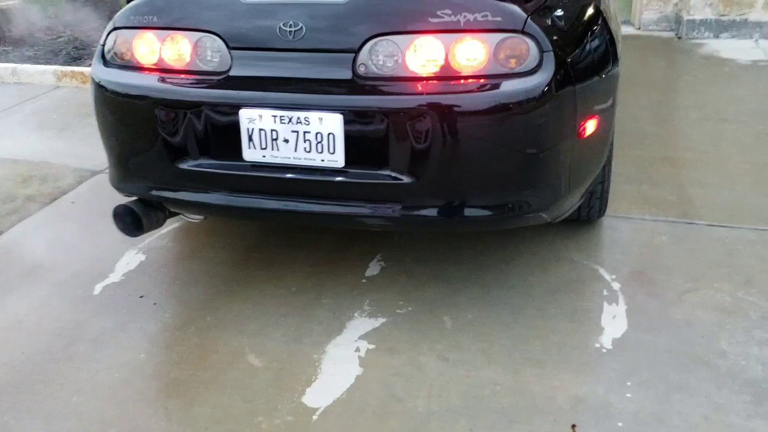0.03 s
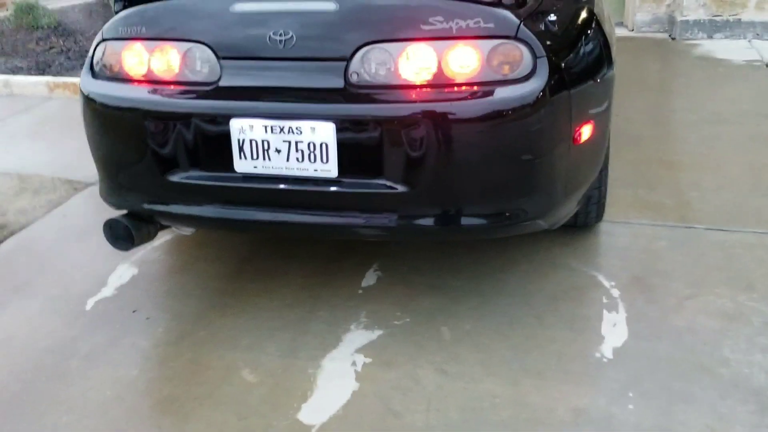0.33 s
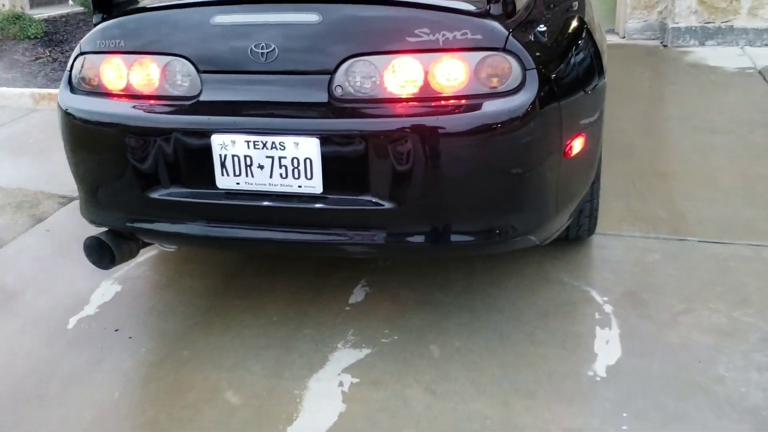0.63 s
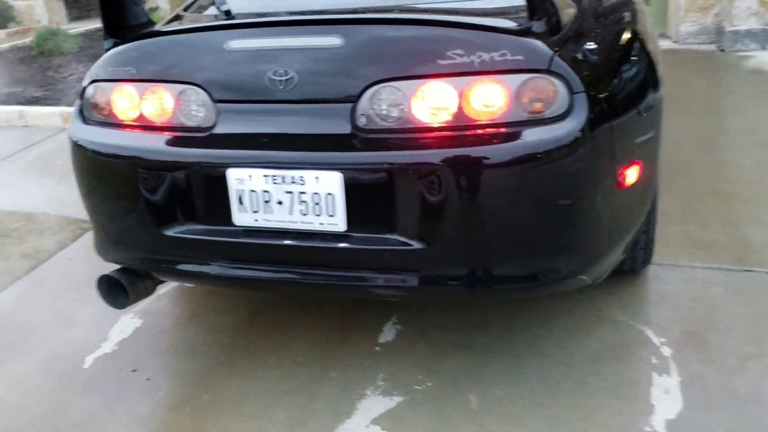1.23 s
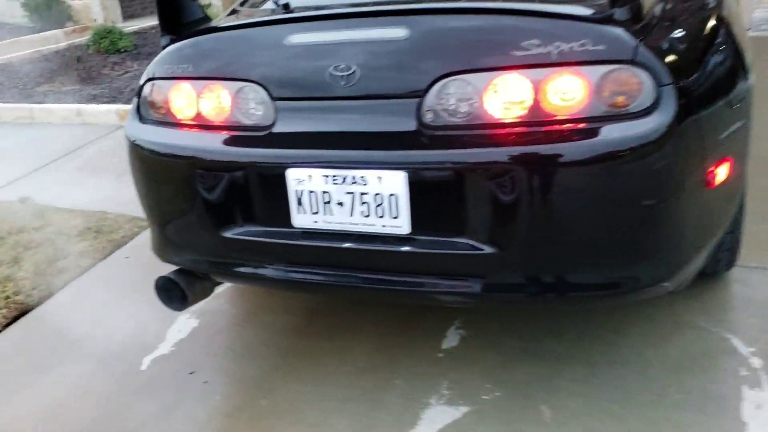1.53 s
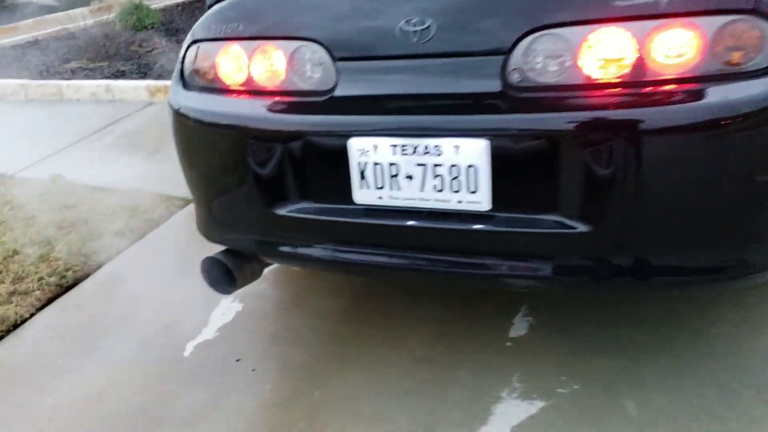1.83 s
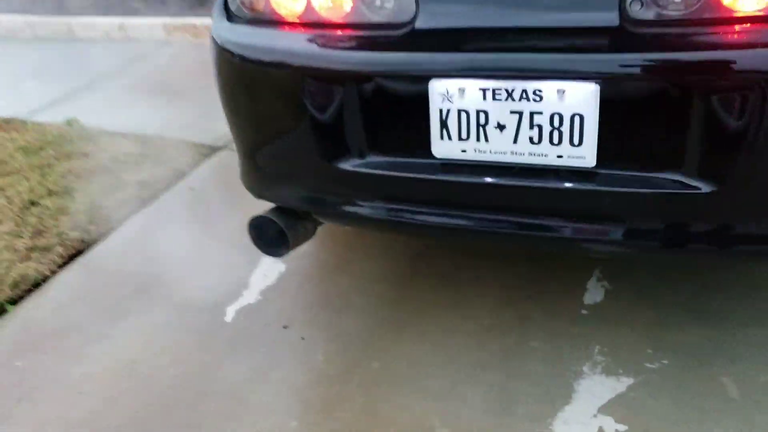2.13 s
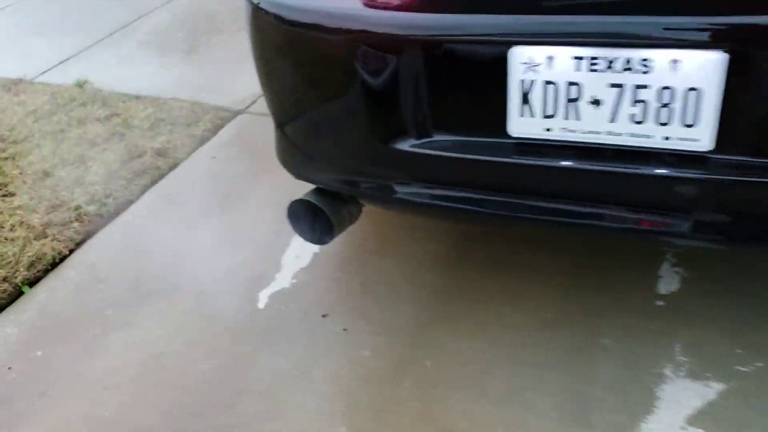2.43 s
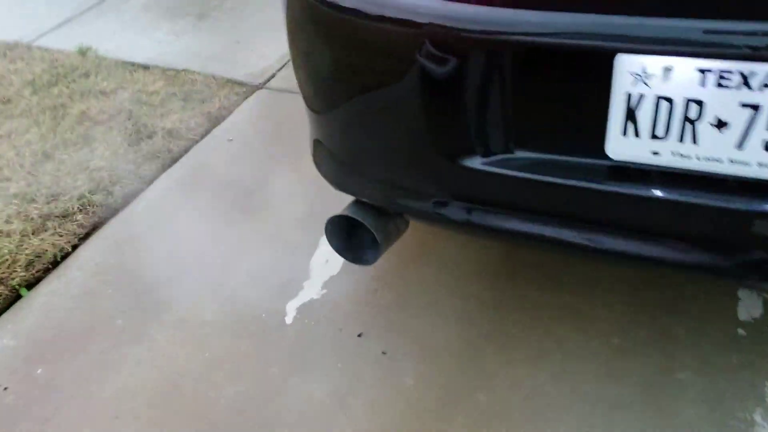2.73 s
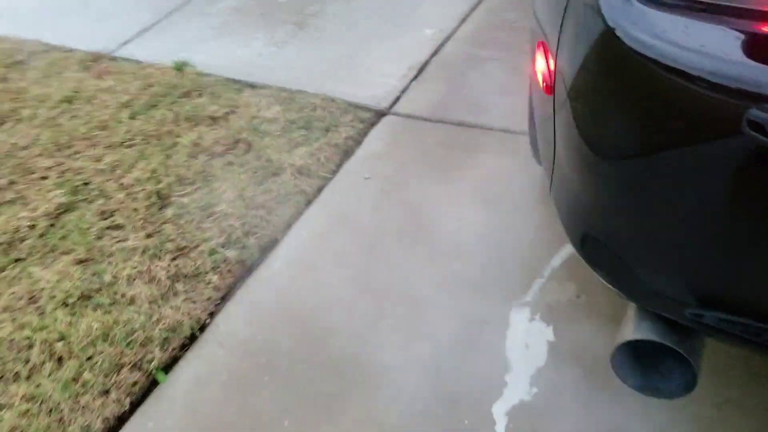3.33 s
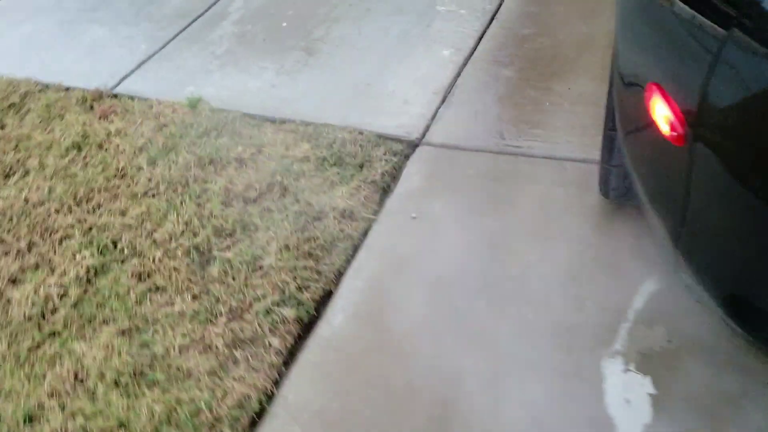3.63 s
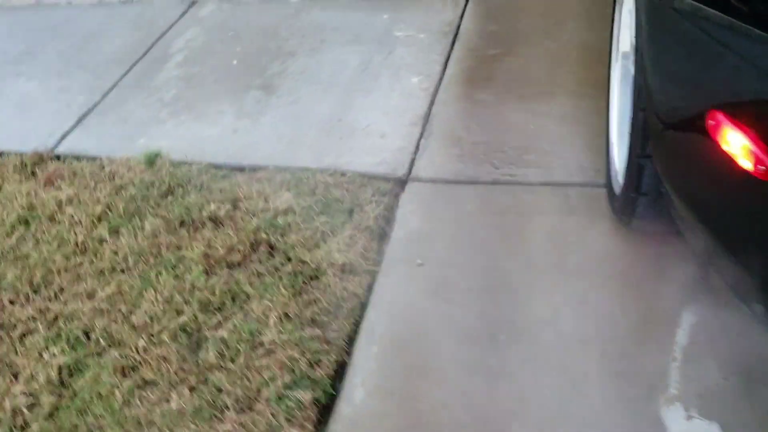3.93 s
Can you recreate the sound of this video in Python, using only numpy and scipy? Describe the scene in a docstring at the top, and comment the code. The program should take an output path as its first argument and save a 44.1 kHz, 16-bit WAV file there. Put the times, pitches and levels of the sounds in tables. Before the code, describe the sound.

A car engine idles from the very start with a deep, steady exhaust boom and a slight lope, heard from close behind. A faint engine whir, hiss and hum lie beneath it. From about 2 seconds the microphone moves beside the tailpipe and the soft puffing grows clearer, with one brief, small sputter near 2.9 seconds. The idle sinks slightly in pitch and continues until 4 seconds.

```python
"""The low boom of an idling six-cylinder car cuts in, heard from behind and then from beside the tailpipe.
Periodic pressure pulses make the boom at the firing rate; unequal cylinders make it lope once per cycle.
Each firing pushes a puff of turbulent gas through the pipe, with one brief sputter near 2.9 s.
Behind the exhaust, the running engine faintly whirs, hisses and hums."""
import sys
import numpy as np
from scipy.fft import rfft, irfft, next_fast_len
from scipy.io import wavfile
from scipy.ndimage import map_coordinates

SR = 44100
rng = np.random.default_rng(int(sys.argv[2]) if len(sys.argv) > 2 else 0)


def dump(signal):
    """Clip the signal to [-1, 1] and save it as 16-bit WAV at the path in sys.argv[1]."""
    limited = np.clip(np.atleast_2d(signal).T, -1, 1)
    pcm = np.round(limited * 32767).astype(np.int16)
    wavfile.write(sys.argv[1], SR, pcm)


N = 176400
CYLINDER_COUNT = 6
# engine speed: t/s, firing rate f/Hz
FIRING_RATE = [(0.09, 71.67), (0.3, 70.41), (0.55, 71.06), (0.8, 71.16), (1.05, 71.03), (1.35, 70.49),
               (1.6, 71.21), (1.85, 71.21), (2.1, 71.63), (2.3, 71.56), (2.55, 70.31), (2.85, 69.89),
               (3.1, 69.44), (3.3, 68.85), (3.6, 67.54), (3.98, 67.79)]


def amp(db):
    """Amplitude ratio of a level in decibels."""
    return 10 ** (np.asarray(db) / 20)


def along(points, hz):
    """Interpolation of (f/Hz, value) points on a logarithmic frequency axis."""
    f, values = np.transpose(points)
    return np.interp(np.log(hz + 1), np.log(f + 1), values)


def curves(rows):
    """Linear interpolation in time: one curve for each column after t/s."""
    times, *columns = np.transpose(rows)
    return [np.interp(np.arange(N) / SR, times, column) for column in columns]


def wobble(rate):
    """Smooth random fluctuation: a spline through `rate` knots a second."""
    return map_coordinates(rng.standard_normal(int(N * rate / SR) + 4), [np.arange(N) * rate / SR])


def filtered(x, response):
    """Linear filtering: the spectrum of x times a frequency response."""
    size = next_fast_len(N + SR // 2)
    return irfft(rfft(x, size) * response(np.fft.rfftfreq(size, 1 / SR)), size)[..., :N]


def noise(spectrum, gate=1):
    """Source and filter: gated white noise, shaped by a spectrum and scaled to rms 1."""
    x = filtered(gate * rng.standard_normal(N), lambda hz: amp(along(spectrum, hz)))
    return x / np.sqrt(np.mean(x ** 2) + 1e-20)


def pan(db):
    """Left and right gains, of mean 1, for an interchannel level difference."""
    gains = amp(np.array([db, -db]) / 2)
    return gains / gains.mean(0)


def spread(pair, colour):
    """Partial coherence: two noises mix into a wide, coloured stereo pair whose mean has rms 1."""
    # likeness of left and right: f/Hz, coherence
    coherence = [(500, 0.41), (1000, 0.35), (2000, 0), (14000, 0.0028)]
    # stereo balance: f/Hz, left minus right level/dB
    balance = [(60, 6.5), (120, -2), (240, 1.5), (470, 2.5), (920, 1.0), (1830, -4.5), (3630, -2),
               (7200, 5), (14300, 1)]
    angle = lambda hz: np.arccos(np.clip(along(coherence, hz), -1, 1)) / 2
    mid, side = filtered(pair, lambda hz: colour(hz) * np.array([np.cos(angle(hz)), np.sin(angle(hz))]))
    stereo = filtered(np.array([mid + side, mid - side]), lambda hz: pan(along(balance, hz)))
    return stereo / np.std(stereo.mean(0))


def position():
    """Listening position, from 0 behind the car to 1 beside the pipe."""
    # the listener's walk: t/s, share of the way round
    walk = [(0, 0), (1.9, 0), (2.4, 0.3), (2.8, 0.79), (3.2, 1), (4, 0.97)]
    return np.clip(curves(walk)[0], 0, 1)


def crank():
    """Phase is the integral of frequency: the running count of firings, slightly unsteady."""
    start, jitter = -.095, 0.0036  # in firings
    return start + np.cumsum(curves(FIRING_RATE)[0]) / SR + jitter * wobble(35)


def whir_peaks():
    """Interference: ground reflections favour narrow bands of whir, whose balance shifts on the walk."""
    # bands: f/Hz, bandwidth/Hz, level behind/dB, level beside/dB
    bands = [(1164, 29, -64, -88), (1334, 85, -64, -61), (1455, 19, -63, -74), (1617, 110, -61.5, -67.5),
             (1890, 17, -64, -76), (2028, 19, -61.5, -72), (2153, 54, -63, -74), (2576, 30, -64, -80),
             (4835, 110, -63, -63.5)]
    centres, widths, behind_db, beside_db = np.transpose(bands)

    def heard(levels):
        """Noise through a sum of Lorentzian peaks."""
        peaks = lambda hz: sum(amp(db) / np.sqrt(width) / (1 + (2 * (hz - centre) / width) ** 2)
                               for centre, width, db in zip(centres, widths, levels))
        return spread(rng.standard_normal((2, N)), peaks) * np.linalg.norm(amp(levels))

    beside = position()
    return np.sqrt(1 - beside) * heard(behind_db) + np.sqrt(beside) * heard(beside_db)


def machinery(firings):
    """Amplitude modulation: half-periodic whir, its peaks and fine hiss pulse gently with the engine."""
    # engine noise: t/s, relative whir level/dB, relative hiss level/dB
    levels = [(0.1, -46.5, -50.5), (0.19, -46, -48.5), (1.04, -45.5, -48), (1.42, -46, -50),
              (1.96, -47, -49), (3.01, -47, -51), (3.58, -49.5, -53), (3.98, -48.5, -53.5)]
    # spectrum of whir and hiss: f/Hz, relative density level/dB
    spectrum = [(410, -29.5), (700, -1), (746, -13.5), (805, -2), (998, -7.5), (1410, -6.5), (1810, -8),
                (2060, -6.5), (2250, -8), (3130, -6.5), (4350, -11), (4810, -10), (5670, -15),
                (7590, -14.5), (8840, -22.5), (12500, -14), (14500, -15)]
    whir_db, hiss_db = curves(levels)
    cycle_points, crossover_hz = 3750, 5600
    cycles = firings / CYLINDER_COUNT
    place = (cycles % 1) * cycle_points
    one_cycle = rng.standard_normal((2, cycle_points))
    periodic = np.array([map_coordinates(row, [place], mode="grid-wrap") for row in one_cycle])
    excitation = np.sqrt(0.5) * (periodic + rng.standard_normal((2, N)))
    low_share = lambda hz: 1 / (1 + (hz / crossover_hz) ** 10)
    colour = lambda hz: amp(along(spectrum, hz))
    whir = spread(excitation, lambda hz: colour(hz) * np.sqrt(low_share(hz)))
    hiss = spread(rng.standard_normal((2, N)), lambda hz: colour(hz) * np.sqrt(1 - low_share(hz)))
    swing_db = np.cos(2 * np.pi * firings) - 0.23 * np.cos(2 * np.pi * cycles) + .5 * wobble(160)
    return amp(swing_db) * (amp(whir_db - .5) * whir + amp(hiss_db + 2) * hiss + whir_peaks())


def hum(firings):
    """High harmonics of the firing rate make a faint hum, 8 dB weaker beside the pipe."""
    # hum partials: multiple of the firing rate, level behind/dB
    partials = [(10, -60.5), (11, -61), (15, -64.5)]
    tones = sum(amp(db + 1.1 * wobble(4.08)) * np.sin(2 * np.pi * k * firings) for k, db in partials)
    return np.sqrt(2) * tones * amp(-8 * position())


def rumble():
    """Turbulence in the exhaust gives steady low-frequency noise."""
    # rumble spectrum: f/Hz, relative density level/dB
    spectrum = [(20, -13), (45, 2), (110, -4.5), (220, -4.5), (290, -4), (350, -25), (600, -58),
                (1500, -100)]
    return amp(-36.5) * noise(spectrum)


def puffs(firings):
    """Pulsating flow: the noise of the gas swells with each firing, a little differently each time."""
    # strength of the flow noise: t/s, relative level/dB
    levels = [(.1, -50), (.8, -45.5), (1.35, -46), (1.8, -46), (2.1, -40.5), (2.45, -41), (2.9, -37),
              (3.3, -37.5), (3.6, -39.5), (4, -38)]
    # spectrum behind the car: f/Hz, relative density level/dB
    behind_spectrum = [(150, -35), (330, -3), (420, -5), (490, 4), (570, -4), (660, 0), (800, -18.5),
                       (1200, -33), (4000, -70)]
    # spectrum beside the pipe: f/Hz, relative density level/dB
    beside_spectrum = [(150, -34), (330, -2.5), (410, -5.5), (480, -2), (560, -10.5), (660, -21),
                       (850, -18), (1200, -38), (4000, -70)]
    swing_db, scatter_db = 7.5, 1.5
    gate = amp(swing_db * np.cos(2 * np.pi * firings) + scatter_db * wobble(70))
    beside = position() ** 1.6
    gas = np.sqrt(1 - beside) * noise(behind_spectrum, gate)
    gas += np.sqrt(beside) * noise(beside_spectrum, gate)
    return amp(curves(levels)[0] - 3) * gas


def sputter():
    """Transients: three sharper puffs leave the pipe as noise bursts with Gaussian envelopes."""
    # bursts: t/s, level at the crest/dB
    bursts = [(2.845, -36.5), (2.873, -25), (2.889, -38)]
    # burst spectrum: f/Hz, relative density level/dB
    spectrum = [(200, -23), (450, 11), (650, -1), (850, -15), (1300, -36), (4000, -70)]
    half_length_s = 0.0018
    t = np.arange(N) / SR
    envelope = sum(amp(db) * np.exp(-((t - at) / half_length_s) ** 2) for at, db in bursts)
    return envelope * noise(spectrum)


def lope(firings):
    """Fourier series: unequal cylinders repeat only once per cycle, adding harmonics of the cycle rate."""
    # harmonics: multiple of the cycle rate, weight behind/dB, weight beside/dB
    orders = [(4, -42.8, -46.5), (5, -49.2, -46.5), (7, -52.7, -49.4), (8, -47.1, -41.1), (9, -34.7, -31.2),
              (10, -37.7, -37.5), (11, -37.8, -37.3), (13, -28.3, -32.5), (14, -39.9, -38.4),
              (15, -32.5, -29.7), (16, -38.8, -38.1), (17, -33.7, -33.2), (18, -31.7, -25.1),
              (19, -30.0, -27.4), (20, -37.1, -35.2), (21, -32.6, -34.4), (22, -38.8, -40.3),
              (23, -53.4, -53.0), (24, -42.7, -38.6), (25, -41.5, -46.5), (26, -44.2, -52.9),
              (27, -49.8, -52.0), (28, -62.6, -49.6), (30, -63.4, -57.2), (33, -63.4, -51.0),
              (35, -59.9, -54.4), (36, -54.8, -48.6), (39, -67.6, -51.9), (40, -63.0, -50.9),
              (41, -60.4, -51.7), (42, -48.7, -51.3), (43, -63.8, -55.4), (48, -64.8, -50.7),
              (54, -57.4, -60.6)]
    # cylinders in firing order: relative pulse strength, lateness/firings
    cylinders = [(1.02, .011), (.91, .013), (1.06, -.02), (1.0, -.009), (1.06, -.014), (.96, .025)]
    pipe_delay_s, muffler_hz, muffler_width_hz, scatter_db = .0052, 242, 74, 1.62
    strength, lateness = np.transpose(cylinders)
    pulse_places = (np.arange(CYLINDER_COUNT) + lateness) / CYLINDER_COUNT
    cycles = firings / CYLINDER_COUNT
    cycle_hz = np.median(curves(FIRING_RATE)[0]) / CYLINDER_COUNT
    beside = position()
    tones = np.zeros(N)
    for k, behind_db, beside_db in orders:
        pulse_phase = np.angle(np.dot(strength, np.exp(-2j * np.pi * k * pulse_places)))
        gain = (amp(behind_db) * (1 - beside) + amp(beside_db) * beside) * amp(scatter_db * wobble(7))
        hz = k * cycle_hz
        # travel down the pipe and the muffler's resonance both retard the phase
        pipe_lag = 2 * np.pi * hz * pipe_delay_s
        muffler_lag = 2 * np.arctan2(hz * muffler_width_hz, muffler_hz ** 2 - hz ** 2)
        tones -= gain * np.cos(2 * np.pi * k * cycles + pulse_phase - pipe_lag - muffler_lag)
    return np.sqrt(2) * amp(0.02) * tones


def boom(firings):
    """Smooth periodic pressure pulses leave the muffler as a fundamental and its octave."""
    # firing tone: t/s, fundamental level/dB, octave level/dB
    levels = [(0.1, -13.5, -17.5), (0.12, -14, -15.5), (0.67, -13, -14), (1.34, -13.5, -14),
              (2.22, -12.5, -12), (3.87, -12.5, -17.5), (3.94, -13, -17.5), (3.98, -10.5, -16.5)]
    fundamental_db, octave_db = curves(levels)
    octave_lag_s, scatter_db = 0.00074, 0.6  # the octave trails only towards the pipe
    trailing = firings - octave_lag_s * position() * curves(FIRING_RATE)[0]
    fundamental = amp(fundamental_db) * np.cos(2 * np.pi * firings)
    octave = amp(octave_db) * np.cos(2 * np.pi * 2 * trailing)
    return -np.sqrt(2) * (fundamental + octave) * amp(scatter_db * wobble(23.24))


def scene():
    """Time and level differences place the tailpipe as a near point source before the wide machinery."""
    # arrival of the exhaust: t/s, delay of left behind right/s
    delay = [(0, -.00004), (1.2, .00002), (1.8, .00009), (4, .00018)]
    # balance of the exhaust: t/s, left minus right level/dB
    balance = [(0, 3.2), (4, 2.6)]
    firings = crank()
    exhaust = boom(firings) + lope(firings) + hum(firings) + puffs(firings) + sputter() + rumble()
    half_lag = curves(delay)[0] * SR / 2
    stereo = np.array([map_coordinates(exhaust, [np.arange(N) + shift], mode="nearest")
                       for shift in (-half_lag, half_lag)])
    return stereo * pan(curves(balance)[0]) + machinery(firings)


def record(dry):
    """Gating and band limiting: the sound cuts in abruptly and loses its highest treble."""
    start_s, rise_s, top_hz = 0.0899, 0.0016, 14600
    gate = np.clip((np.arange(N) / SR - start_s) / rise_s, 0, 1)
    return filtered(dry * gate, lambda hz: hz < top_hz)


dry = scene()
out = record(dry)
dump(out)
```